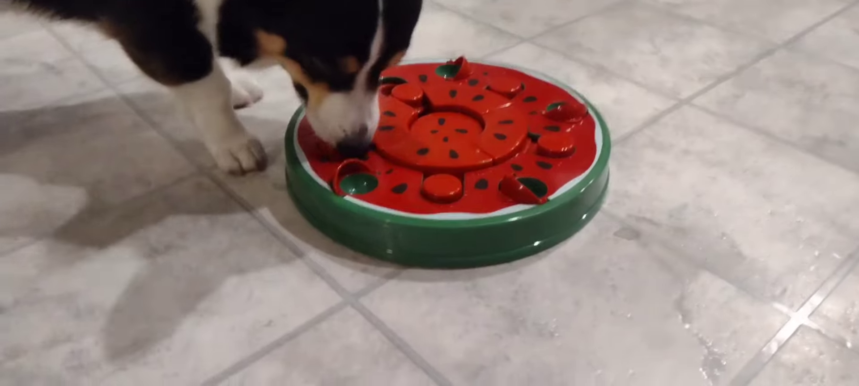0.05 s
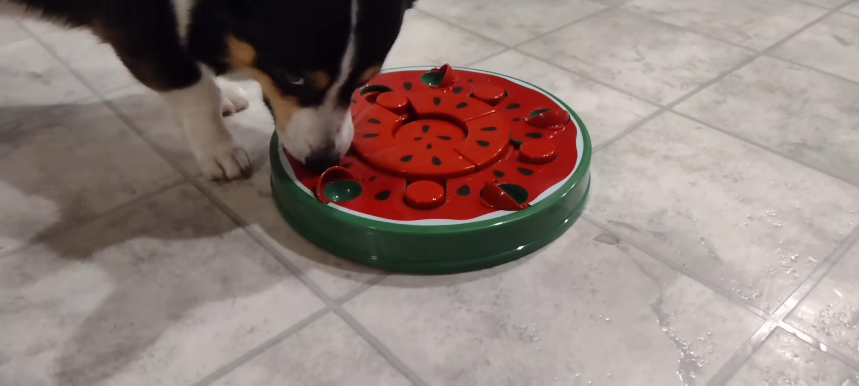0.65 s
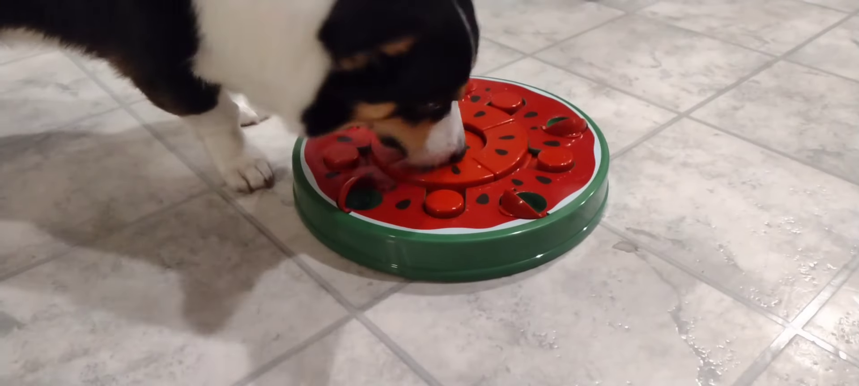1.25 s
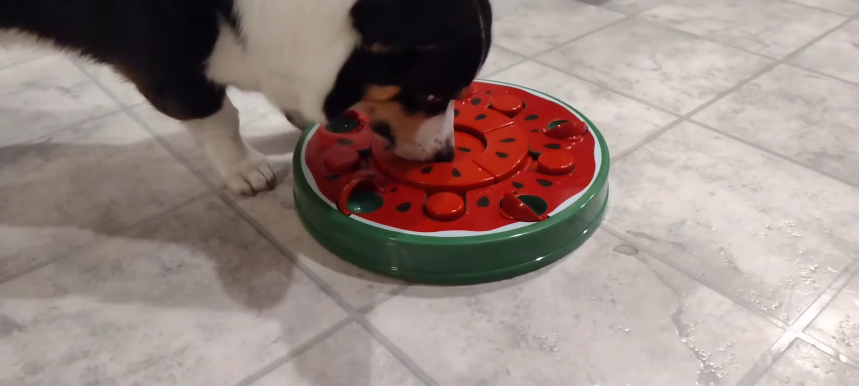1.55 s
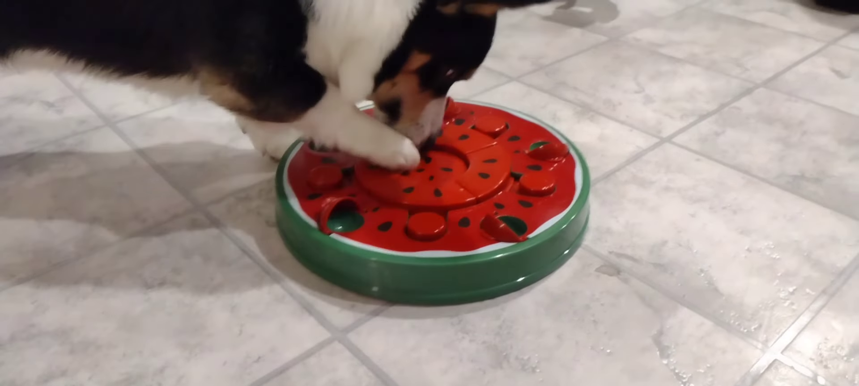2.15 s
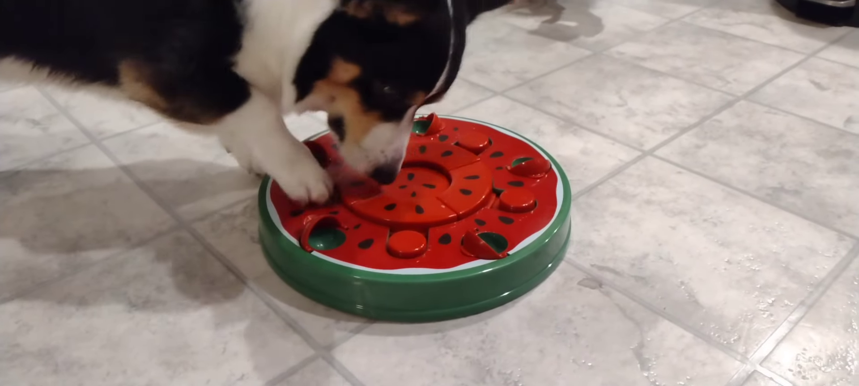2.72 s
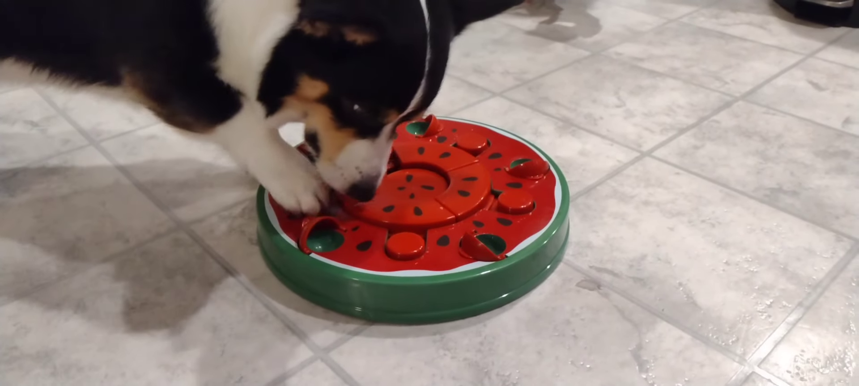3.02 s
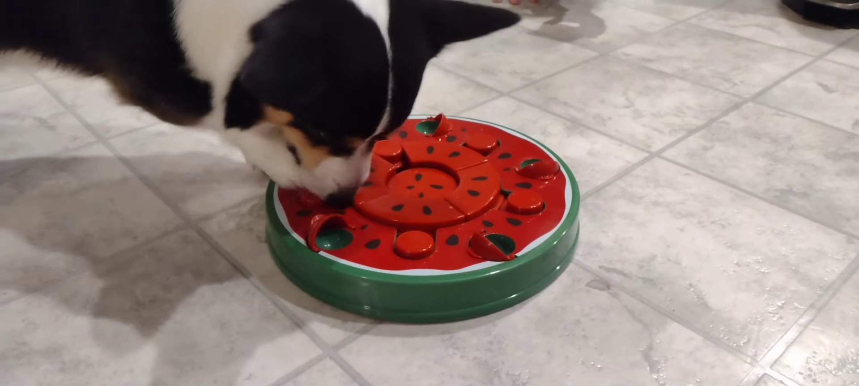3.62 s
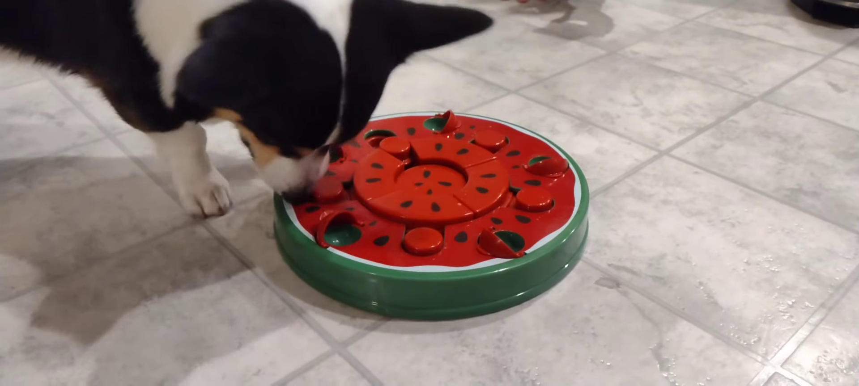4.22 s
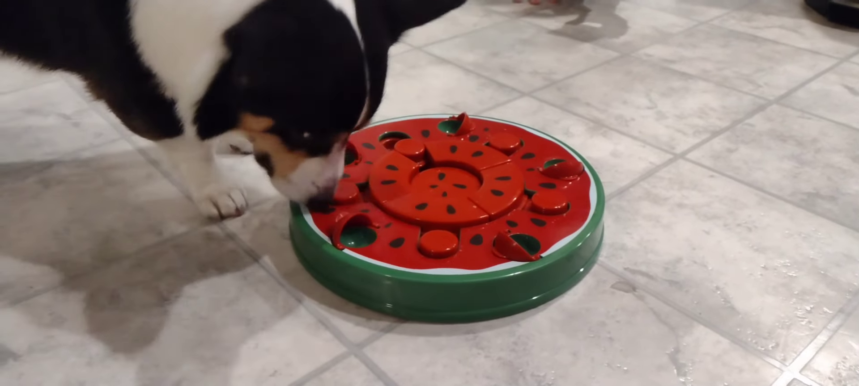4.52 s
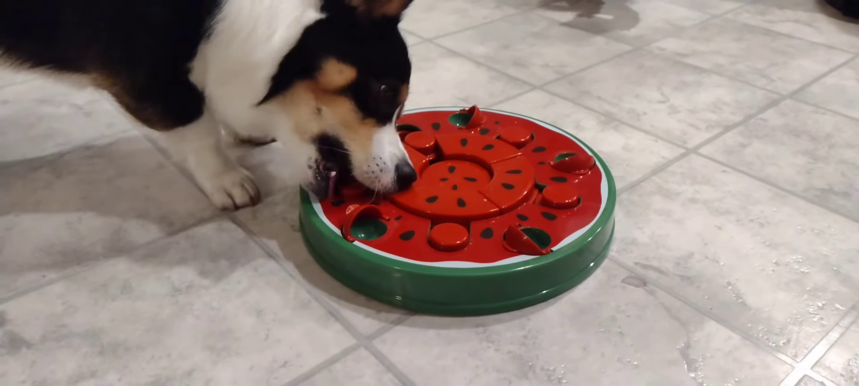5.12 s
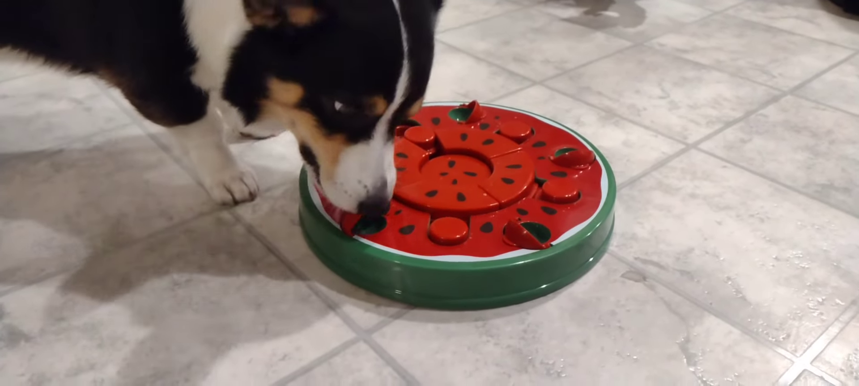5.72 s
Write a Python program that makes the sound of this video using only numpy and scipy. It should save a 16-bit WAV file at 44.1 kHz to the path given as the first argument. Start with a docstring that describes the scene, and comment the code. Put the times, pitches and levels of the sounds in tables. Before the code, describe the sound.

A dog nudges a hollow plastic treat puzzle, making hard clicks that build into rattling, scraping clatter and thin out again.

```python
"""A dog works a hollow plastic treat puzzle on a tiled floor, heard by a camera's stereo microphones.
The hard room hums faintly throughout and rings after each click. The first light clicks are cut across
at 0.2 s by a tap on the camera, beside the right microphone. From 2 s to 3.7 s nose and paws get busy:
lids and sliders rattle and scrape, fur rubs, and the tray rocks with dull thuds. Then the clicks thin
out, and the dog sniffs at 4.6 s and once more, faintly, near the end."""
import sys
import numpy as np
from scipy import signal
from scipy.fft import rfft, irfft, next_fast_len
from scipy.io import wavfile
from scipy.ndimage import uniform_filter1d, map_coordinates

SR = 44100
rng = np.random.default_rng(int(sys.argv[2]) if len(sys.argv) > 2 else 0)


def wrap_up_sound(samples):
    """Save the sound to the file named by the first command line argument, as 16-bit audio."""
    columns = np.atleast_2d(samples).T
    # keep every value between -1 and 1, then stretch to whole-number steps
    tamed = np.clip(columns, -1, 1)
    steps = np.round(tamed * 32767).astype(np.int16)
    wavfile.write(sys.argv[1], SR, steps)


N = 254202
CLICK_SAMPLES = 4096

# plastic striking plastic: start_s, level_db, pitch_hz, snap_db (treble against the clack near 1 kHz)
CLICKS = [(0.04, -35, 8100, -5), (0.048, -31, 8000, -1), (0.124, -40.5, 870, -10.5),
          (0.371, -26.5, 800, -15.5), (0.445, -36, 1160, -8), (0.541, -25.5, 850, -13),
          (0.628, -34.5, 1600, -17.5), (0.762, -38.5, 950, -14), (0.89, -46, 1220, -8.5),
          (0.896, -42, 1700, -9.5), (1.643, -38, 1610, -1.5), (1.663, -48, 500, 5),
          (1.884, -38.5, 1230, 0.5), (1.887, -32, 2290, -4.5), (2.019, -39, 536, -19),
          (2.058, -44, 3570, 0.5), (2.064, -34, 3660, -6.5), (2.108, -32.5, 875, -32),
          (2.135, -23.5, 1050, -16.5), (2.264, -17, 920, -12), (2.279, -24.5, 890, -5),
          (2.331, -28, 1200, -5), (2.342, -28.5, 865, 3), (2.357, -18, 930, 2.5), (2.434, -24.5, 1100, -35),
          (2.59, -40.5, 3230, 7.5), (2.605, -29, 3670, -7.5), (2.724, -29.5, 790, -16),
          (2.736, -19, 1180, -2), (2.76, -15, 875, -5.5), (2.767, -14, 700, -5), (2.845, -24, 1200, -8.5),
          (2.854, -21, 872, -36), (2.926, -26, 1160, -3.5), (2.934, -28.5, 895, 3),
          (2.977, -16.5, 1160, 2.5), (3.034, -24, 4700, -5), (3.042, -16, 860, -9.5),
          (3.058, -16.5, 794, -9.5), (3.115, -4.5, 750, -11), (3.129, -19, 560, -1), (3.139, -23, 797, 0),
          (3.171, -16, 840, -7), (3.207, -16.5, 870, -18.5), (3.223, -20, 600, -15.5),
          (3.277, -17.5, 1100, -16), (3.311, -35.5, 834, 0.5), (3.362, -15, 1400, -15.5),
          (3.372, -9, 1290, -8.5), (3.478, -19, 840, -12.5), (3.49, -1, 825, -12), (3.505, -10, 700, -34.5),
          (3.511, -11.5, 926, -4), (3.705, -27, 802, -30), (3.717, -25.5, 840, -12), (3.797, -46, 853, 0.5),
          (3.877, -35.5, 1300, -13), (3.942, -37, 1170, -23), (3.97, -26, 840, -2),
          (4.133, -27.5, 2430, -7), (4.15, -26.5, 2430, -8), (4.158, -31.5, 3500, -7.5),
          (4.233, -24.5, 920, -14), (4.538, -26.5, 1200, -13), (4.602, -40, 7600, 5),
          (4.643, -24, 1110, -14), (4.648, -24.5, 2070, -13), (4.821, -45.5, 541, 4),
          (4.949, -29, 1110, -14), (5.036, -23.5, 830, -18.5), (5.042, -22.5, 1480, -14.5),
          (5.201, -37, 615, -17.5), (5.307, -39, 553, -18.5), (5.44, -32.5, 1250, -16.5),
          (5.451, -31, 950, -28)]
# tone colour of the plastic: freq_hz, gain_db
PLASTIC_COLOUR = [(30, -31), (70, 0), (200, 13), (400, 11), (600, 11), (870, 9.5), (1100, 9.5), (1500, 8.5),
                  (2200, 8), (4000, 9.5), (5500, 5), (7000, 2), (11000, -4.5), (15500, -8)]
# resonances of the hollow tray: pitch_hz, level_db, t60_s
TRAY_MODES = [(204, 1.5, 0.12), (316, -6, 0.9), (515.6, 6.5, 0.12), (595.2, 3, 0.18), (796, -3, 0.16),
              (860.4, 6, 0.13), (926, 6.5, 0.053), (1034, -15.5, 0.14), (1216, 11.5, 0.033),
              (1339, 6, 0.044), (1460, -13.5, 0.066), (1596, 19, 0.018), (1950, -2.5, 0.091),
              (2808, 8.5, 0.034), (4300, -54.5, 0.03), (5550, 14.5, 0.016)]
# shoves that drag a piece over the tray: start_s, length_s, level_db
SHOVES = [(2.14, 0.016, -47.5), (2.29, 0.054, -39), (2.765, 0.013, -32.5), (3.0, 0.068, -39),
          (3.17, 0.077, -41), (3.39, 0.063, -42.5), (3.52, 0.1, -35.5)]
# the tray rocking on the floor: start_s, level_db, pitch_hz
TRAY_THUDS = [(2.14, -41, 67), (2.275, -42, 70), (2.36, -35, 73), (2.765, -38.5, 69.6), (3.02, -35, 61.6),
              (3.37, -53, 73), (3.505, -32, 69.5)]
# soft hollow bumps of muzzle and paw: start_s, level_db, pitch_hz
DOG_BUMPS = [(2.275, -45.5, 212), (2.36, -34, 302), (2.37, -39, 166), (2.77, -34.5, 144), (2.975, -43, 197),
             (3.375, -42, 128), (3.50, -37, 150), (3.55, -38, 220), (3.635, -37, 141), (3.985, -48.5, 160),
             (4.007, -42, 233), (4.478, -51.5, 334), (4.957, -50, 320), (5.154, -42, 259)]
# muzzle and paws rubbing on the tray: start_s, length_s, level_db
RUB_SPELLS = [(.33, 0.094, -55), (.55, 0.46, -68.5), (2.12, 0.39, -62), (2.72, 0.97, -54),
              (3.97, 0.035, -54), (4.2, 0.14, -60.5), (4.62, 0.03, -53.5), (5.02, 0.054, -56.5),
              (5.44, 0.17, -62)]
# tone colour of fur on plastic: freq_hz, gain_db
FUR_COLOUR = [(40, -32), (80, 2), (250, -4), (600, 1), (1200, -0.5), (2500, -12), (6000, -18),
              (15000, -42.5)]
# the dog's sniffs: start_s, length_s, level_db
BREATHS = [(4.56, 0.083, -51.5), (5.555, 0.023, -64)]
# tone colour of air in the nostrils: freq_hz, gain_db
NOSE_COLOUR = [(200, -9), (800, 2), (2000, 3.5), (3800, -3.5), (6800, -5.5), (10000, -14), (15000, -20)]
# a knock as it reaches the microphone through the camera's shell: freq_hz, gain_db
SHELL_COLOUR = [(20, -29), (70, 1.5), (170, 12.5), (350, 5), (520, -3), (1000, -7.5), (2000, -19.5),
                (4200, -17), (6500, -30), (10000, -39.5), (15500, -42)]
# direct sound from the puzzle at the two microphones: freq_hz, left_minus_right_db
MIC_BALANCE = [(200, 0), (500, -.5), (1000, -3.5), (2000, -1.5), (4500, 3), (9000, 6), (14000, 5)]
# decay of the tiled room: freq_hz, t60_s
ROOM_DECAY = [(80, 1), (250, 0.075), (800, 0.34), (3000, 0.35), (7000, 0.28), (15000, 0.63)]
# tone colour of the room's tail: freq_hz, gain_db
ROOM_COLOUR = [(60, 4), (250, 4), (800, -4.5), (2000, -2.5), (4000, -3.5), (8000, -6.5), (15000, -9.5)]
# how alike diffuse sound is at the two microphones: freq_hz, correlation
MIC_LIKENESS = [(60, 0.99), (400, 0.79), (900, 0.061), (1800, 0.016), (15000, 0.19)]
# air noise of the still room: freq_hz, gain_db
AIR_COLOUR = [(25, -24), (50, -13), (65, -4), (110, 0), (320, 0), (520, -2), (700, -9), (1050, -10),
              (1400, -15), (2100, -9), (2800, -18), (4000, -21), (5300, -28), (15500, -35)]
# an appliance's hum: pitch_hz, level_db
HUM_TONES = [(118.6, -69), (236.9, -81), (419.9, -82), (500.6, -78), (1098, -82)]


def plastic_clicks(gain_db=16.0, scatter_db=1, scatter_t60_s=0.019, bend_s=0.004, early_s=0.002):
    """Each contact is a sharp push that scatters off rims and ribs and rings the tray."""
    out = np.zeros((2, N))
    t, hz = np.arange(CLICK_SAMPLES) / SR, np.fft.rfftfreq(CLICK_SAMPLES, 1 / SR)
    push = t == 0
    # bending waves run faster at high pitch, so every click is a tiny falling chirp
    bending = np.exp(-4j * np.pi * bend_s * np.sqrt(1000 * (hz + 600)))
    for start_s, level_db, pitch_hz, snap_db in CLICKS:
        scatter = amp(scatter_db) * noise_burst(t, scatter_t60_s)
        ring = tray_ring(t)
        contact_db = hardness(hz, level_db, snap_db) + piece_pop(hz, level_db, pitch_hz)
        colour = amp(level_db + gain_db) * causal(along(PLASTIC_COLOUR, hz) + contact_db) * bending
        direct = irfft(colour * even_spectrum(push + scatter + ring))
        # over all directions the scattering partly averages out
        all_round = irfft(colour * even_spectrum(push + 0.5 * scatter + ring))
        add(out, start_s - early_s, in_room(direct, wet_db=-0.5, all_round=all_round))
    return out


def hardness(hz, level_db, snap_db):
    """A contact's tilt in dB: a harder one is shorter, and so brighter."""
    knock_db = -11 - 0.19 * (level_db + 20.5)  # the hollow knock gives way to the clack in strong blows
    tick_db = min(-2.5 + 1.4 * snap_db, snap_db)  # the top octave grows faster, but never passes the snap
    return along([(350, knock_db), (700, 0.0091), (1900, 0.0047),
                  (3400, snap_db), (5800, snap_db), (8500, tick_db)], hz)


def piece_pop(hz, level_db, pitch_hz, pop_db=5, width_octaves=0.25):
    """The struck piece's resonance in dB; it stands out more in a light touch."""
    octaves = np.log2((hz + 1) / pitch_hz)
    peak = 1 / (1 + (octaves / width_octaves) ** 2)
    lightness_db = 0.2 * np.clip(-6.0 - level_db, 0, 20)
    # a small piece radiates little below its own pitch
    low_cut_db = 5 * np.clip(octaves + 0.5, -1, 0) * (pitch_hz > 1000)
    return pop_db * peak + lightness_db * (peak - 0.5) + low_cut_db


def tray_ring(t, gain_db=-46):
    """The tray's modes die away, their strength and phase varying from blow to blow."""
    pitch_hz, level_db, t60_s = np.transpose(TRAY_MODES)[..., None]
    strength = amp(level_db + rng.normal(0, 1.0, level_db.shape) - 60 * t / t60_s)
    modes = strength * np.cos(2 * np.pi * (pitch_hz * t + rng.random(pitch_hz.shape)))
    return amp(gain_db) * modes.sum(0) * (1 - t / t[-1])


def scrape(slips_per_s=220, spread_db=5):
    """Plastic sticks and slips on plastic: dense small ticks of uneven size."""
    slips = (rng.random(N) < slips_per_s / SR) * rng.choice([-1, 1], N)
    sizes = amp(spread_db * rng.standard_normal(N).clip(-2, 2))
    dulling = [(100, -6), (400, -7.5), (800, 1), (1500, 2.0), (3000, -5), (6000, -34.5), (14000, -31.5)]
    grains = filtered(slips * sizes, lambda hz: causal(along(PLASTIC_COLOUR, hz) + along(dulling, hz)))
    envelope = gestures(SHOVES, attack_s=0.044, release_s=0.093)
    return in_room(unit(grains) * envelope, wet_db=-0.5)[:, :N]


def thumps(rows, gain_db, rise_s, t60_s):
    """Soft blows, each setting one low, well-damped resonance swinging."""
    out, t = np.zeros(N), np.arange(SR // 2) / SR
    for start_s, level_db, pitch_hz in rows:
        rise = 1 - np.exp(-(t / rise_s) ** 2)
        decay = amp(level_db + gain_db - 60 * t / t60_s)
        add(out, start_s, rise * decay * np.sin(2 * np.pi * pitch_hz * t))
    return in_room(out, wet_db=-8)[:, :N]


def rubbing(uneven_db=3, strokes_per_s=25):
    """Fur and lips brush the plastic in short, uneven strokes."""
    strokes = map_coordinates(rng.standard_normal(400), [np.arange(N) / SR * strokes_per_s], mode="mirror")
    brush = filtered(rng.standard_normal(N), lambda hz: amp(along(FUR_COLOUR, hz)))
    envelope = gestures(RUB_SPELLS, attack_s=0.21, release_s=0.21)
    return in_room(unit(brush * amp(uneven_db * strokes)) * envelope, wet_db=3)[:, :N]


def sniffs(whistle_hz=5400, width_hz=400):
    """Air hisses through the dog's nostrils, which whistle faintly."""
    whistle_db = lambda hz: 5 / (1 + ((hz - whistle_hz) / width_hz) ** 2)
    hiss = filtered(rng.standard_normal(N), lambda hz: amp(along(NOSE_COLOUR, hz) + whistle_db(hz)))
    envelope = gestures(BREATHS, attack_s=0.077, release_s=0.11)
    return in_room(unit(hiss) * envelope, wet_db=4)[:, :N]


def camera_tap(start_s=0.1835, peak_db=-7.0, left_db=-32, rattle_db=-3, rattle_t60_s=0.22):
    """A knock and short rattle through the camera's shell, right beside the right microphone."""
    out = np.zeros(N)
    t, hz = np.arange(CLICK_SAMPLES * 2) / SR, np.fft.rfftfreq(CLICK_SAMPLES * 2, 1 / SR)
    thin_db = along([(300, -12.5), (900, 1.5), (2000, 12.0), (4000, 1), (9000, 3.5)], hz)
    rattle = amp(rattle_db + thin_db) * rfft(noise_burst(t, rattle_t60_s))
    knock = irfft(causal(along(SHELL_COLOUR, hz)) * (1 + rattle))
    add(out, start_s, amp(peak_db) * knock / np.abs(knock).max())
    return out * amp([[left_db], [0]])


def in_room(direct, wet_db, all_round=None, build_s=0.00077):
    """The direct path to the microphones, plus the tiled room's answer to what is sent out all round."""
    hz, t, noise = signal.stft(diffuse(size=SR * 3 // 4), SR, nperseg=256)
    t60_s = along(ROOM_DECAY, hz)[:, None]
    fade = amp(along(ROOM_COLOUR, hz)[:, None] - 60 * t / t60_s) * (1 - np.exp(-t / build_s))
    equal_energy = np.sqrt(2 * np.log(1000) / (t60_s * SR))
    tail = signal.istft(noise * fade * equal_energy, SR, nperseg=256)[1]
    send = direct if all_round is None else all_round
    out = amp(wet_db) * signal.fftconvolve(send[None], tail, axes=1)
    # the left microphone leads; in the treble the lead depends on which part of the puzzle radiates
    side = np.array([[0.5], [-0.5]])
    lead_s, treble_lead_s = 0.00018, rng.normal(0, 0.00006)
    phase = lambda f: 2 * np.pi * (lead_s * np.minimum(f, 1800) + treble_lead_s * np.maximum(f - 1800, 0))
    to_mics = lambda f: amp(side * along(MIC_BALANCE, f)) * np.exp(1j * side * phase(f))
    out[:, :len(direct)] += filtered(direct, to_mics)
    return out


def room_tone(air_db=-62):
    """Faint air noise all round and, in the centre, the slightly unsteady hum of an appliance."""
    t = np.arange(N) / SR
    air = amp(air_db) * unit(filtered(diffuse(size=N), lambda hz: amp(along(AIR_COLOUR, hz))))
    drift = lambda: 0.5 * map_coordinates(rng.standard_normal(64), [t * 5], mode="mirror")
    hum = sum(np.sqrt(2) * amp(db) * np.sin(2 * np.pi * hz * t + drift()) for hz, db in HUM_TONES)
    return air + hum


def diffuse(size):
    """Noise from all round: alike at both microphones in the bass, nearly unrelated in the treble."""
    angle = lambda hz: np.arccos(np.clip(along(MIC_LIKENESS, hz), -1, 1)) / 2
    shares = lambda hz: np.array([np.cos(angle(hz)), np.sin(angle(hz))])
    mid, side = filtered(rng.standard_normal((2, size)), shares)
    return np.array([mid + side, mid - side])


def gestures(rows, attack_s, release_s):
    """Gain per sample: each row swells, holds and fades, tenfold in attack_s and release_s."""
    t = np.arange(N) / SR
    start_s, length_s, level_db = np.transpose(rows)[..., None]
    outside = np.maximum((start_s - t) / attack_s, (t - start_s - length_s) / release_s)
    return amp(level_db - 20 * np.maximum(outside, 0)).max(0)


def noise_burst(t, t60_s):
    """Decaying noise with a total energy of 1."""
    return unit(rng.standard_normal(len(t)) * amp(-60 * t / t60_s)) / np.sqrt(len(t))


def even_spectrum(blow):
    """The spectrum of a blow, with the same energy in every broad band."""
    spectrum = rfft(blow)
    return spectrum / np.sqrt(uniform_filter1d(np.abs(spectrum) ** 2, size=160))


def filtered(x, response):
    """x through a filter given as a function of frequency."""
    n = x.shape[-1]
    padded = next_fast_len(n + 8192)
    return irfft(rfft(x, padded) * response(np.fft.rfftfreq(padded, 1 / SR)), padded)[..., :n]


def causal(db):
    """The minimum-phase response with these dB on the FFT grid."""
    cepstrum = irfft(np.log(amp(db)))
    half = len(cepstrum) // 2
    cepstrum[1:half] *= 2
    cepstrum[half + 1:] = 0
    return np.exp(rfft(cepstrum))


def add(track, start_s, sound):
    """Mix a sound in at start_s."""
    i = max(round(start_s * SR), 0)
    track[..., i:i + sound.shape[-1]] += sound[..., :max(N - i, 0)]


def along(points, hz):
    """Points of freq_hz, value, read on a log frequency axis."""
    freq_hz, values = np.transpose(points)
    return np.interp(np.log(hz + 1), np.log(freq_hz + 1), values)


def amp(db):
    """Decibels to gain."""
    return 10 ** (np.asarray(db) / 20)


def unit(x):
    """Scaled to rms 1."""
    return x / np.sqrt(np.mean(x ** 2) + 1e-20)


def scene():
    """The puzzle and the dog on the floor, the tap at the microphone, the room behind."""
    thuds = thumps(TRAY_THUDS, gain_db=5.0, rise_s=0.026, t60_s=0.17)
    bumps = thumps(DOG_BUMPS, gain_db=6.0, rise_s=0.0031, t60_s=0.093)
    return plastic_clicks() + scrape() + thuds + bumps + rubbing() + sniffs() + camera_tap() + room_tone()


def record(dry, top_hz=16000):
    """The camera cuts off steeply above its band limit."""
    return filtered(dry, lambda hz: 1 / np.sqrt(1 + (hz / top_hz) ** 120))


dry = scene()
out = record(dry)
wrap_up_sound(out)
```